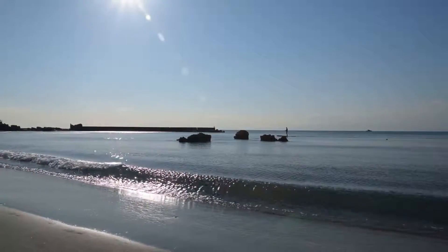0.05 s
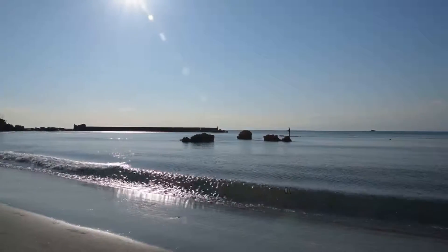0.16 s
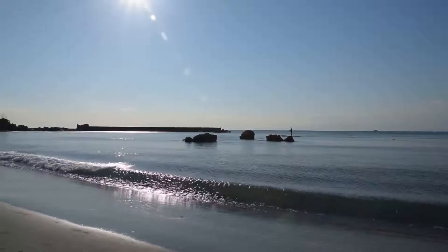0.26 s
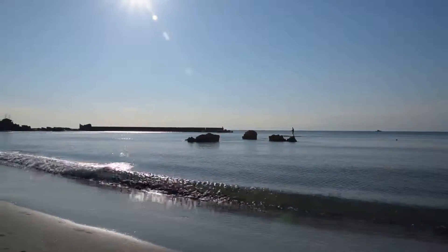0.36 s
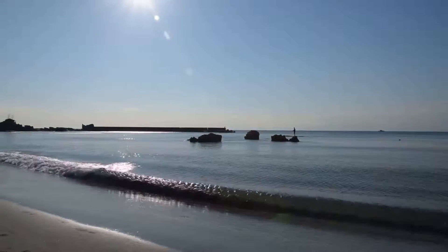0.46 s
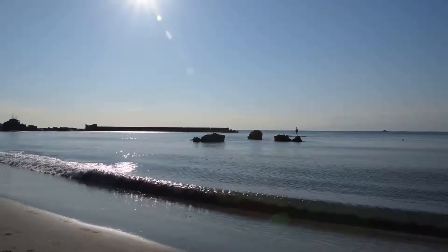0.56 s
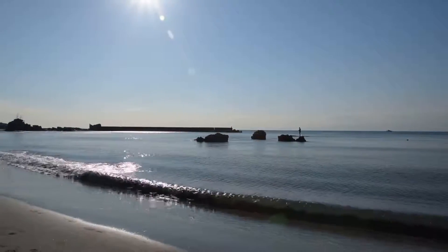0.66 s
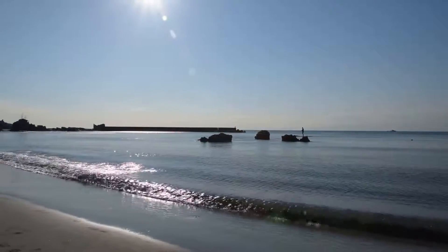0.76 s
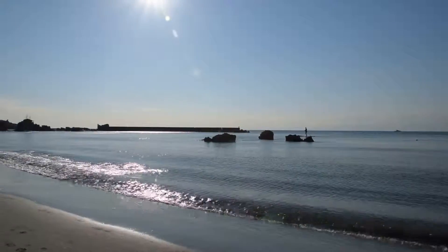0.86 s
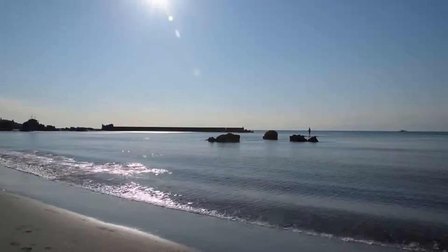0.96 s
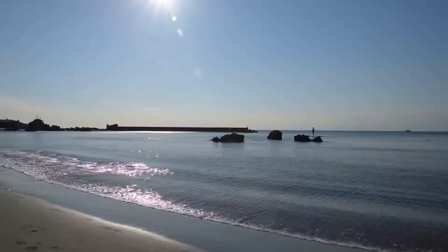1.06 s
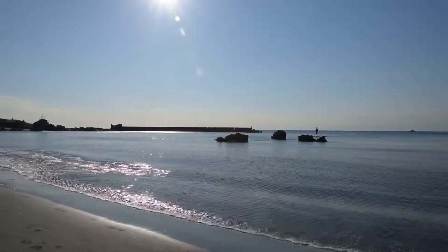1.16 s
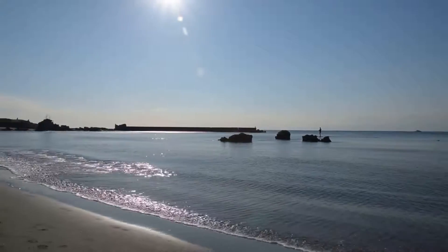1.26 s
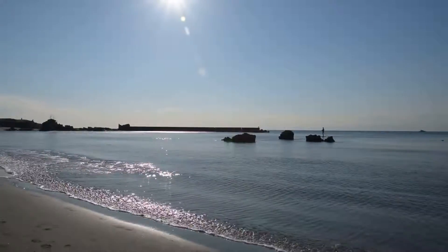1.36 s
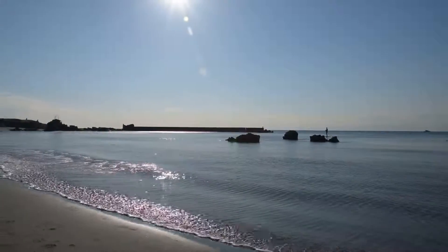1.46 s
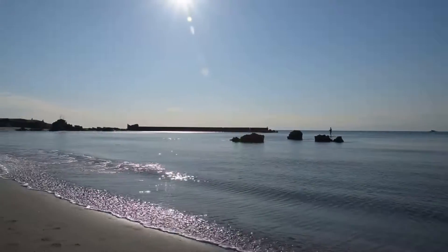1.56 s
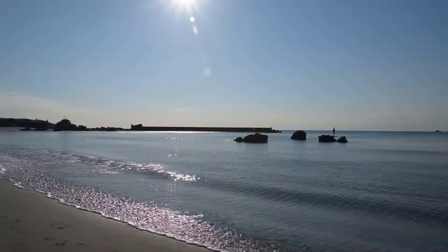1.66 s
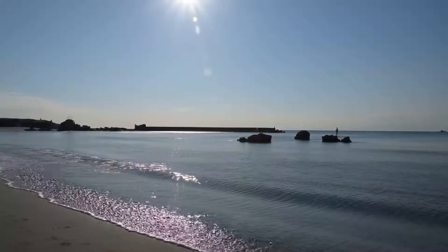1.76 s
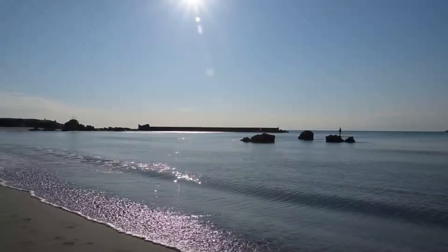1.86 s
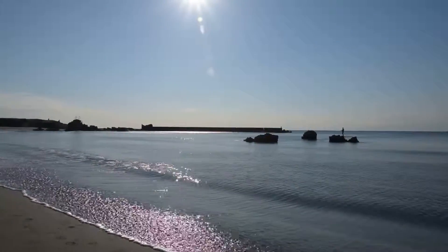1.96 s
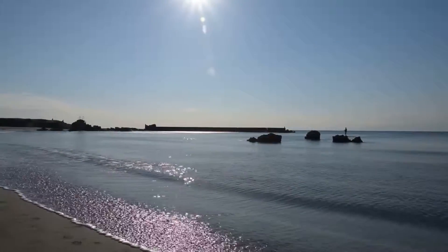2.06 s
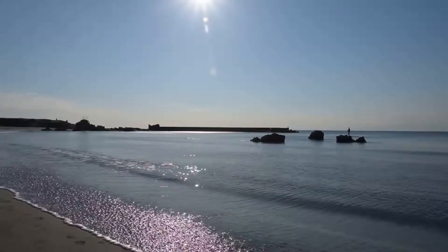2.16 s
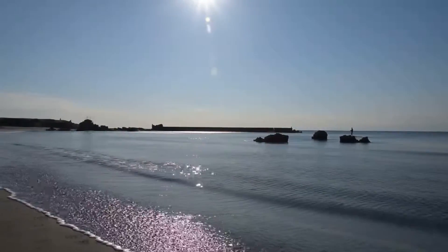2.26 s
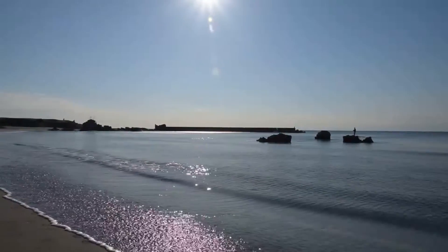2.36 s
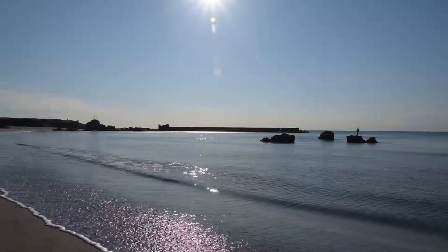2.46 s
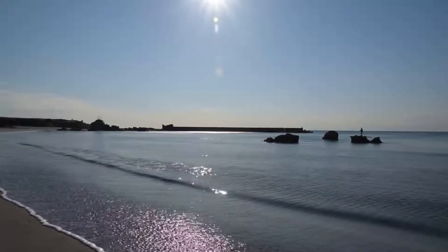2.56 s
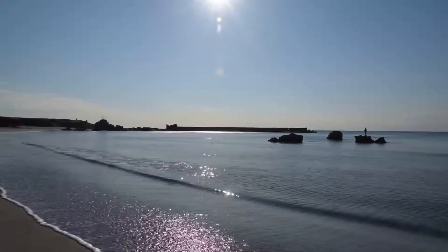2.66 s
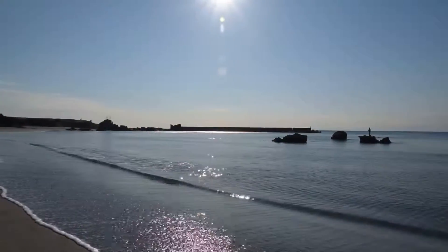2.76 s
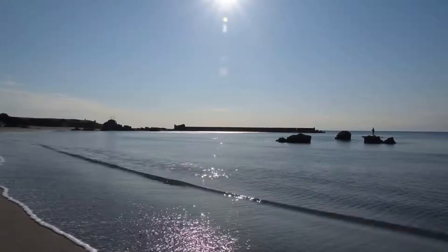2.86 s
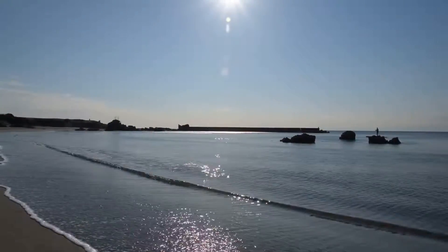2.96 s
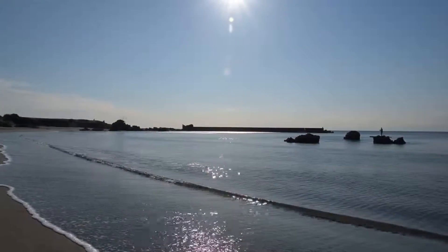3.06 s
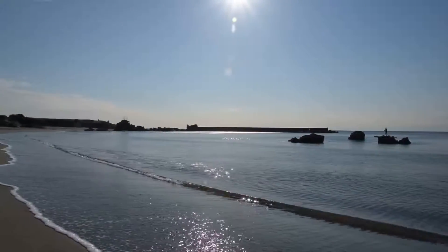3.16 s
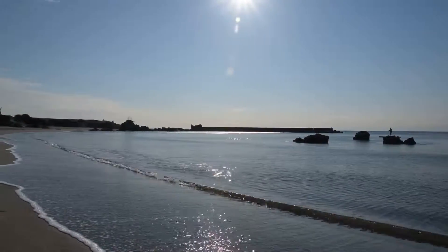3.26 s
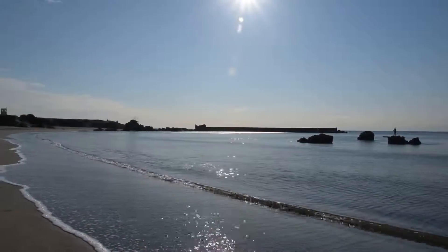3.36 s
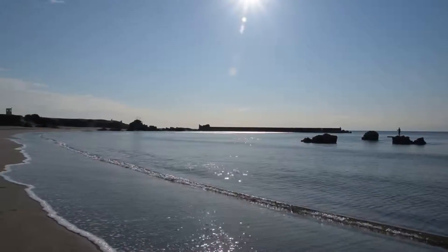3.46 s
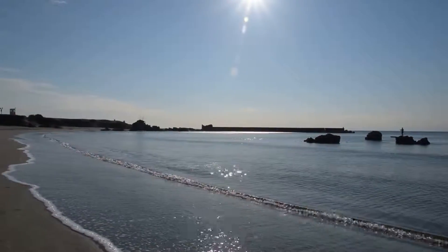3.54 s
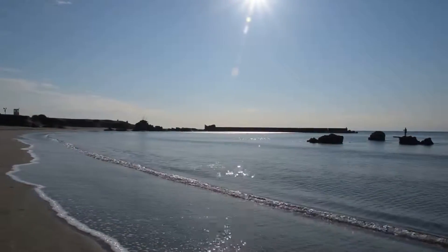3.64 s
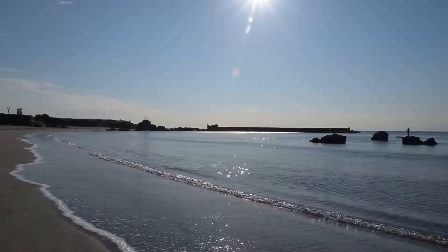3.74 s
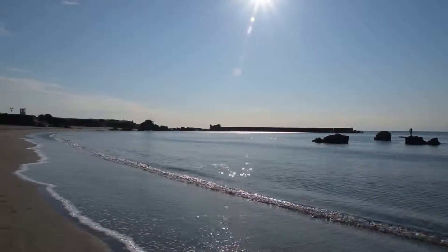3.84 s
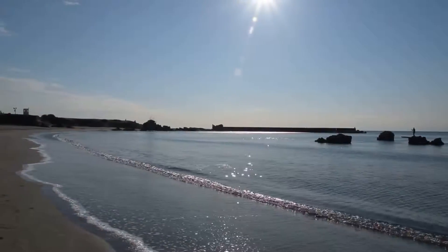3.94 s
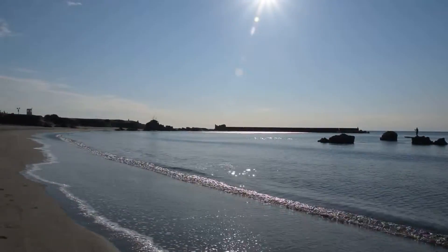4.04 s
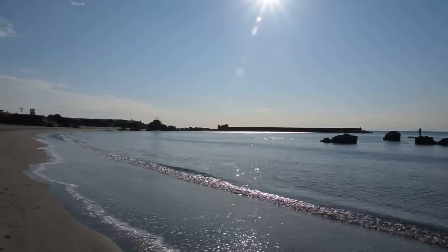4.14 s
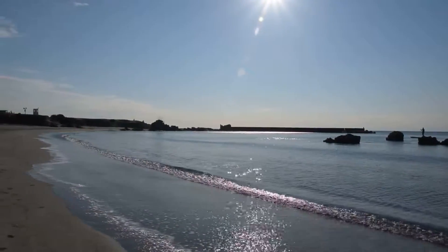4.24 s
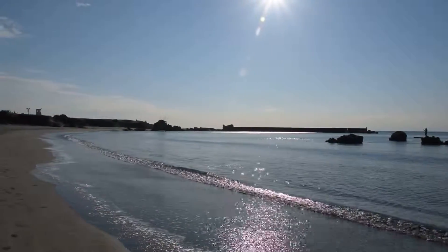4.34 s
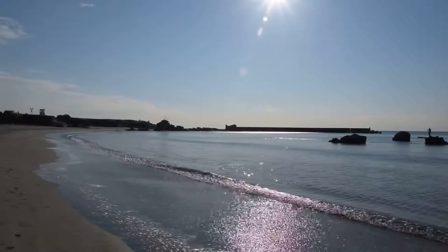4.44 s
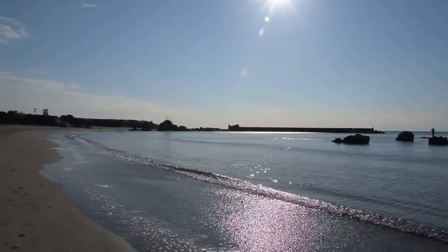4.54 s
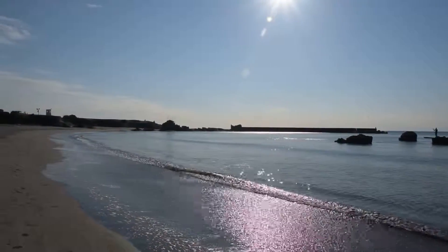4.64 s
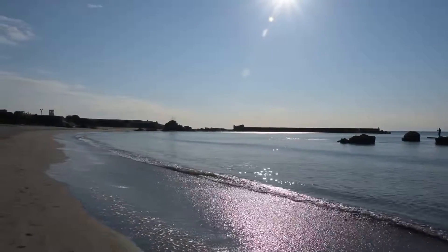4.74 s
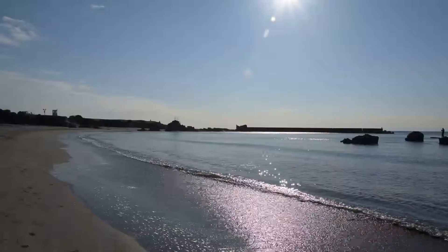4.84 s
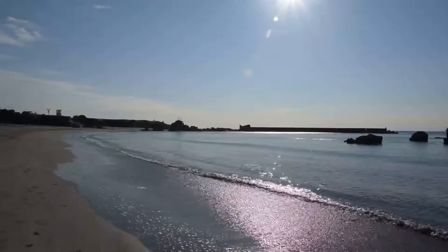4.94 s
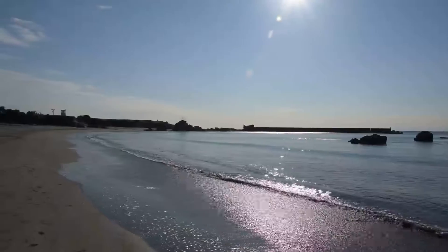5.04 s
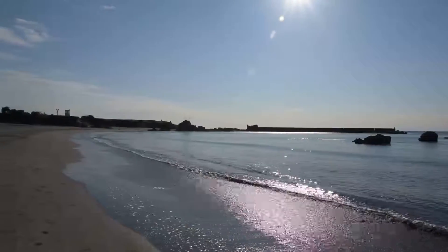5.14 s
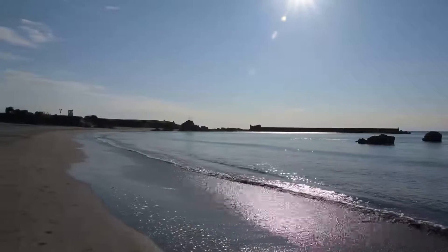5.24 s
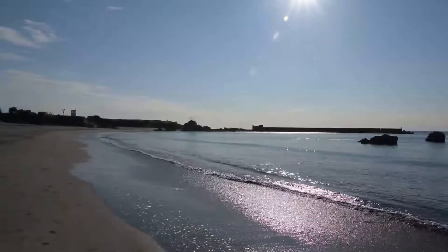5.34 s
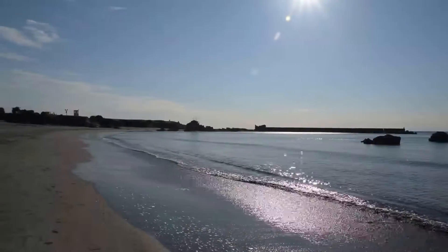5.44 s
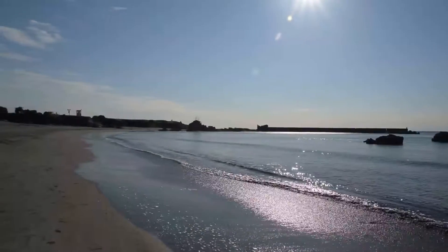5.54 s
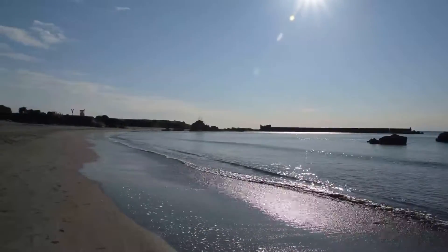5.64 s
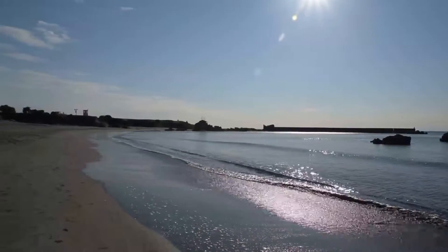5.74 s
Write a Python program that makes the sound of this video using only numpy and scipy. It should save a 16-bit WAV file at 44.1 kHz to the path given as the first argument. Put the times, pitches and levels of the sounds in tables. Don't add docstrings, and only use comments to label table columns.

```python
import sys
import numpy as np
from scipy import signal
from scipy.fft import rfft, irfft, next_fast_len
from scipy.io import wavfile
from scipy.ndimage import uniform_filter1d, map_coordinates

SR = 44100
rng = np.random.default_rng(int(sys.argv[2]) if len(sys.argv) > 2 else 0)


def int16_out(signal):
    q = np.round(np.clip(np.atleast_2d(signal).T, -1, 1) * 32767)
    wavfile.write(sys.argv[1], SR, q.astype(np.int16))


def level_to_linear(level):
    exponent = np.asarray(level, float) / 20
    return 10 ** exponent


N = 255780

# t/s, lead/ms
LEAD = [(0, 0.84), (.7, 0.84), (.9, -0.22), (1.2, -0.53), (2.8, -0.74), (3.2, 0.81), (3.9, .85),
        (4.3, 0.24), (4.8, -0.083), (5.8, -0.46)]


def unit(x):
    return x / np.sqrt(np.mean(np.mean(x, axis=0) ** 2) + 1e-20)


def along(points, hz):
    f, v = np.transpose(points)
    return np.interp(np.log(hz + 1), np.log(f + 1), v)


def curves(rows):
    s, *cols = np.transpose(rows)
    return [np.interp(np.arange(N) / SR, s, c) for c in cols]


def sides(db):
    pair = np.array([level_to_linear(db / 2), level_to_linear(-db / 2)])
    return pair / np.sqrt(np.mean(pair ** 2, axis=0))


def wobble(rate):
    knots = rng.standard_normal(int(N * rate / SR) + 4)
    return map_coordinates(knots, [np.arange(N) * rate / SR])


def filtered(x, response):
    m = next_fast_len(N + 8192)
    return irfft(rfft(x, m) * response(np.fft.rfftfreq(m, 1 / SR)), m)[..., :N]


def blend(level_db, pan_db):
    power = level_to_linear(2 * level_db)
    total = power.sum(axis=0)
    return 10 * np.log10(total), (power * pan_db).sum(axis=0) / total


def pockets(s, peak, hz, cycles, glide, pan_db, lead_ms, size=1400):
    out, k = np.zeros((2, N + size + SR)), np.arange(size)
    turns = hz[:, None] * k / SR
    age = turns / cycles[:, None]
    tone = np.sin(2 * np.pi * turns * (1 + glide[:, None] * age / 2))
    ring = tone * age * np.exp(1 - 3 * age) * 3 * (1 - k / size)
    for side, gain, shift in zip(out, sides(pan_db), (-.5, .5)):
        start = np.clip(np.round((s + shift * lead_ms / 1000) * SR).astype(int), 0, N)
        where = (start[:, None] + k).ravel()
        side += np.bincount(where, (ring * (peak * gain)[:, None]).ravel(), len(side))
    return out[:, :N]


def shoreline(spread_ms, patchy_db, diffuse_db, count=4):
    lead, = curves(LEAD)
    z = signal.stft(rng.standard_normal((count + 2, N + 400)), nperseg=256)[2]
    field = rng.standard_normal(z.shape)
    field = uniform_filter1d(uniform_filter1d(field, size=5, axis=1), size=7, axis=2)
    noise = signal.istft(z * level_to_linear(patchy_db * field / field.std()), nperseg=256)[1]
    pair = level_to_linear(diffuse_db) * noise[count:, :N]
    at = np.arange(N) + 200
    for stretch, offset in zip(noise, np.linspace(-1, 1, count)):
        half = np.round((lead + offset * spread_ms) * SR / 2000).astype(int)
        pair = pair + np.array([stretch[at + half], stretch[at - half]])
    return pair


def swarm(rate, centre_hz, cycles, spread_db, size):
    total = int(rate * N / SR)
    u, g = rng.random((total, 2)), rng.standard_normal((total, 4))
    s = u[:, 0] * N / SR
    lead = np.interp(s, *np.transpose(LEAD)) + .15 * g[:, 0]
    peak = level_to_linear(-spread_db * np.log(u[:, 1] + 0.012))
    hz = centre_hz * np.exp(0.445 * g[:, 1])
    lengths = cycles * np.exp(0.33 * g[:, 2])
    return pockets(s, peak, hz, lengths, 0.2 + 0 * s, 3 * g[:, 3], lead, size=size)


def crests():
    # start/s, length/s, churn level/dB, tilt from large to small clouds/dB per size,
    # left-right/dB
    breakers = [(0, 0.62, -37.5, 4, 2), (0.52, 0.018, -54.5, -16, -4), (0.722, 0.02, -38, -4.5, 6),
                (0.81, 0.11, -37, 5, 4.5), (0.957, 0.02, -49.5, -16, -6), (0.957, 0.12, -41.5, 5.5, -5),
                (1.067, 0.12, -46, -1.5, 4), (1.176, 0.0076, -48, -3, -1), (1.3, 0.57, -59.5, 13, -6),
                (1.353, 1.85, -55, -6, -4), (1.884, 1.37, -56.5, 7.5, -1), (3.257, 0.04, -48, -8, -4),
                (3.33, 0.05, -42, 2, 6), (3.438, 0.034, -40.5, -1.5, 4), (3.604, 0.12, -39.5, 1, 8.5),
                (3.795, 0.18, -41, 1.5, 5), (3.878, .03, -42, -2, -5), (3.965, 0.18, -41.5, .8, 2.5),
                (4.203, 0.52, -48.5, 8, 4.5), (4.796, 0.073, -44, 5.5, 5), (4.937, 0.25, -44.5, 7.5, 5),
                (5.29, 0.14, -51.5, 8.5, 5), (5.574, 0.016, -51.5, 4, 0), (5.663, 0.16, -49.5, 4, -3)]
    rises = [136, 82, 55]
    falls = [147, 75, 43]
    flanks = [-3, -0.5, -3]
    s, length, db, tilt_db, pan_db = np.transpose(breakers)[..., None]
    t = np.arange(0, N + 64, 64) / SR
    early, late = np.maximum(s - t, 0), np.maximum(t - s - length, 0)
    sizes = []
    for step, flank_db, rise, fall in zip(range(-1, 2), flanks, rises, falls):
        level_db = db + step * tilt_db + flank_db - rise * early - fall * late
        sizes.append(blend(level_db, pan_db))
    return curves(np.transpose([t, *[level for level, _ in sizes], sizes[1][1]]))


def foam():
    # t/s, flow level/dB, left-right/dB
    foam_flow = [(0, -41.5, 6.5), (.47, -41.5, 6), (.76, -35, 5.5), (.82, -31, 3), (.97, -29.5, 1),
                 (1.02, -31, 3.5), (1.39, -41.5, -2), (1.58, -47.5, -3), (2.96, -57.5, 1.5),
                 (3.2, -48.5, 15), (3.5, -43, 13), (3.9, -39.5, -3), (4.25, -44.5, 2.5), (4.59, -44, 5.5),
                 (4.78, -38.5, 5), (5.1, -37, -1), (5.4, -45, -1), (5.8, -47.5, -3.5)]
    flow_db, pan_db = curves(foam_flow)
    t = np.arange(N) / SR
    seep_s, seep_peak_db, seep_pan_db = 1.93, -48.5, 5
    rise_db_per_s, fall_db_per_s = 19, 5
    seep_db = seep_peak_db - np.maximum(rise_db_per_s * (seep_s - t), fall_db_per_s * (t - seep_s))
    even_db, growth, ahead_s = -31.5, 1.275, 0.092
    sheet_db = even_db + growth * (flow_db - even_db)
    ahead_db = np.interp(t + ahead_s, t, pan_db)
    fizz_db, fizz_pan = blend(np.array([sheet_db, seep_db]), np.array([ahead_db, seep_pan_db + 0 * t]))
    return [flow_db, fizz_db], pan_db, fizz_pan


def surf():
    # f/Hz, level/dB per Hz
    water_colour = [(100, -5), (200, -2), (500, 4.5), (1000, 3), (2100, -1), (2600, -6.5), (4300, -9),
                    (5600, -12.5), (7500, -11), (9200, -14.5), (11500, -15.5), (14000, -20.5), (15800, -23)]
    # f/Hz, left-right/dB
    body_shadow = [(100, -1.5), (500, 3), (1500, 1.5), (4000, -2), (8000, -2.5), (14000, 9)]
    cloud_hz = [85, 240, 560, 1500, 3600, 8500, 60000]
    *breaking, churn_pan = crests()
    sheet, foam_pan, fizz_pan = foam()
    surge_db = .5 * wobble(40)
    clouds = [
        (0.079 * churn_pan, shoreline(0.87, 1.9, -4.0, count=2), swarm(60, 220, 1.8, 2.0, size=1200), -7),
        (churn_pan, shoreline(0.13, 0.51, -3.4, count=2), swarm(320, 665, 7.2, 2.0, size=700), -4.5),
        ((churn_pan + foam_pan) / 2, shoreline(0.14, 0.77, 1, count=2),
         swarm(600, 1450, 3.7, 3.6, size=300), -5.5),
        (foam_pan, shoreline(0, 0.52, 0, count=0), swarm(1500, 3590, 5.0, 4.5, size=120), -7),
        (fizz_pan, shoreline(0, 1.5, 0, count=0), swarm(2700, 8000, 1.06, 5.6, size=30), -7)]
    total = 0
    for k, (level_db, (pan_db, wash, bubbles, bubble_db)) in enumerate(zip(breaking + sheet, clouds)):
        hump = list(zip(cloud_hz[k:k + 3], (-.15, 1, -.15)))
        share = lambda hz: np.sin(np.pi / 2 * np.clip(along(hump, hz), 0, 1))
        band = lambda hz: share(hz) * sides(along(body_shadow, hz))
        wash = unit(filtered(wash, lambda hz: band(hz) * level_to_linear(along(water_colour, hz))))
        cloud = wash + level_to_linear(bubble_db) * unit(filtered(bubbles, band))
        total = total + unit(cloud * sides(pan_db - np.mean(pan_db))) * level_to_linear(level_db + surge_db)
    return total


def far_sea():
    # f/Hz, level/dB per Hz
    bay_colour = [(90, -29), (130, 0), (300, 1.5), (520, 2), (640, -8), (1000, -4.5), (1300, -10),
                  (2100, -3.5), (2500, -18), (4500, -23), (9000, -17), (12000, -8.5), (15000, -26)]
    hush = filtered(shoreline(0.092, 1.2, 0., count=2), lambda hz: level_to_linear(along(bay_colour, hz)))
    return level_to_linear(-46.5 - 6) * unit(hush)


def wind():
    # t/s, level/dB, left-right/dB
    gusts = [(0.0, -45, 7.0), (0.05, -33.5, 14), (0.1, -41, -6), (0.13, -40.5, 12), (0.26, -48, 3),
             (0.53, -43, 8.5), (0.58, -51, 0.0), (0.82, -44, 7), (0.87, -46, 2.0), (0.9, -44.5, 5),
             (1.44, -49, 0.5), (1.95, -41.5, 0.5), (2.16, -48.5, 2), (2.62, -45, -1.0), (2.67, -45.5, 8),
             (3.34, -47.5, 0.5), (5.75, -47.5, -0.5), (5.8, -51, 2.5)]
    # f/Hz, level/dB per Hz
    rumble_colour = [(8.8, -40), (15, -15), (43, -9), (70, -3.5), (83, -5), (102, -12.5), (119, -13.5),
                     (200, -18), (260, -48), (440, -120)]
    level_db, pan_db = curves(gusts)
    shared, left, right = rng.standard_normal((3, N))
    deep = lambda hz: level_to_linear(3) * 60 / (hz + 30) / (1 + (hz / 70) ** 2)
    own = filtered(np.array([left, right]), deep)
    rumble = filtered(shared + own, lambda hz: level_to_linear(along(rumble_colour, hz)))
    return level_to_linear(level_db) * unit(rumble * level_to_linear(1.8 * wobble(5.4)) * sides(pan_db))


def gulps():
    # t/s, peak level/dB, f/Hz, left-right/dB
    big_bubbles = [(.526, -16, 1090, 8), (.568, -5.5, 353, 3), (0.736, -6, 960, 4), (1.97, -29, 404, -3),
                   (2.997, -26, 1150, 3), (3.206, -22, 310, 5), (3.346, -23, 204, 16),
                   (3.383, -10, 1020, 13), (3.619, -5, 592, 7), (3.669, -10, 345, 18), (3.709, -5, 990, 17),
                   (3.899, -3.5, 568, 25), (3.929, -6, 560, -17), (4.098, -12, 276, -4),
                   (4.37, -10, 580, 5), (4.63, -19, 646, -8), (4.86, -18, 630, 4), (4.94, -24, 830, 6),
                   (4.975, -14, 590, 2), (5.17, -13, 760, 4), (3.645, -17, 540, -4), (3.855, -9, 600, -15),
                   (3.95, -16, 640, 0), (5.037, -14, 444, -5), (5.511, -37, 1030, 6), (5.679, -19, 690, 1)]
    s, db, hz, pan_db = np.transpose(big_bubbles)
    cycles, glide = 7.3 + 0 * s, 0.12 + 0 * s
    lead = np.interp(s, *np.transpose(LEAD))
    return pockets(s, level_to_linear(db - 20), hz, cycles, glide, pan_db, lead, size=2000)


def ticks():
    # t/s, peak level/dB, f/Hz, left-right/dB
    foam_cells = [(0.7023, -27, 6820, 14), (0.7327, -28, 6840, 3), (0.7821, -24, 6710, 1),
                  (3.151, -16, 7750, 8), (3.485, -32, 7090, 7), (3.556, -24, 9800, 7),
                  (3.707, -14, 6400, 4), (3.8117, -19, 6560, -1), (3.923, -30, 9320, -1),
                  (4.0203, -21, 11600, -7), (4.0991, -21, 7060, 3), (4.2832, -18, 10000, 11),
                  (4.3182, -11, 10100, 4), (4.4079, -15, 5940, 8), (4.4228, -10, 9300, 6),
                  (4.4822, -34, 8420, 10), (4.6319, -13, 10400, 3), (4.6533, -34, 6650, 8),
                  (4.7267, -28, 7250, -4), (4.7606, -19, 7030, 6), (4.8439, -23, 10300, -7),
                  (4.936, -6, 10400, 4), (5.0005, -28, 6200, 3), (5.0504, -24, 6070, -4.5),
                  (5.1048, -23, 6030, 0), (5.1542, -23, 6970, -5.0), (5.2565, -33, 6370, -3.0),
                  (5.3018, -18, 6480, -3.5), (5.466, -18, 11200, -6), (5.6082, -32, 6050, -7), ]
    s, db, hz, pan_db = np.transpose(foam_cells)
    return pockets(s, level_to_linear(db - 8), hz, 2 + 0 * s, 0 * s, pan_db, .08 * pan_db, size=100)


def slap():
    # t/s, peak level/dB, f/Hz, length/cycles, left-right/dB
    crest_pockets = [(.811, -21.5, 478, 4, 6), (.8272, -14, 1100, 3.6, 4), (0.8262, -17, 1350, 1.3, 2),
                     (0.8297, -17, 980, 5.5, -12), (.8272, -23, 1880, 3.4, -10), (.8335, -17, 710, 1.2, 9),
                     (.8365, -15.5, 887, 6.7, 5), (.84, -18, 1680, 2.3, -2), (.8425, -7.5, 740, 2.9, 18),
                     (.8447, -13.5, 305, 1.2, -4), (.847, -12.5, 430, 1.3, -7), (.874, -28.5, 200, 3.1, 2),
                     (.8553, -12, 696, 0.88, 15), (.8584, -15.5, 169.5, 3, 1), (.8615, -11, 523, .67, 25),
                     (.867, -16, 507, 3.2, 3), (.888, -29, 410, 1.8, 5)]
    # t/s, peak level/dB, f/Hz, length/cycles, glide/share of pitch
    backwash_drips = [
        (5.568, -34, 410, 15, .9),
        (5.645, -34, 540, 10, .5),
        (5.745, -36, 520, 11, .6),
        (5.6562, -28, 3300, 6, .1),
    ]
    rows = [(*row, .02) for row in crest_pockets]
    rows += [(*row[:-1], -1, row[-1]) for row in backwash_drips]
    s, db, hz, cycles, pan_db, glide = np.transpose(rows)
    rings = pockets(s, level_to_linear(db), hz, cycles, glide, pan_db, 0.27 + 0 * s, size=2600)
    t = np.arange(N) / SR
    burst = np.interp(t, [.815, .828, .868, .885], [0, 1, 1, 0])
    noise = rng.standard_normal((2, N)) + rng.standard_normal(N)
    spray = filtered(noise, lambda f: f / (f + 200) / (1 + (f / 1200) ** 3))
    return rings + level_to_linear(-30) * burst * unit(spray * sides(4 + 0 * t))


def scene():
    return surf() + far_sea() + wind() + gulps() + ticks() + slap()


def top_cut(x):
    return signal.sosfilt(signal.butter(12, 16850, fs=SR, output="sos"), x)


def record(dry):
    # f/Hz, width/Hz, depth/dB
    port_notches = [
        [(4980, 560, 4), (4930, 130, 7), (9100, 230, 4), (10240, 1100, 4)],
        [(4880, 100, 0), (8090, 1100, 10.5)],
    ]

    def ports(hz):
        dips = [sum(db * np.exp(-((hz - c) / w) ** 2) for c, w, db in side) for side in port_notches]
        return np.array([level_to_linear(-dip) for dip in dips])

    return top_cut(filtered(dry, ports))


dry = scene()
out = record(dry)
int16_out(out)
```